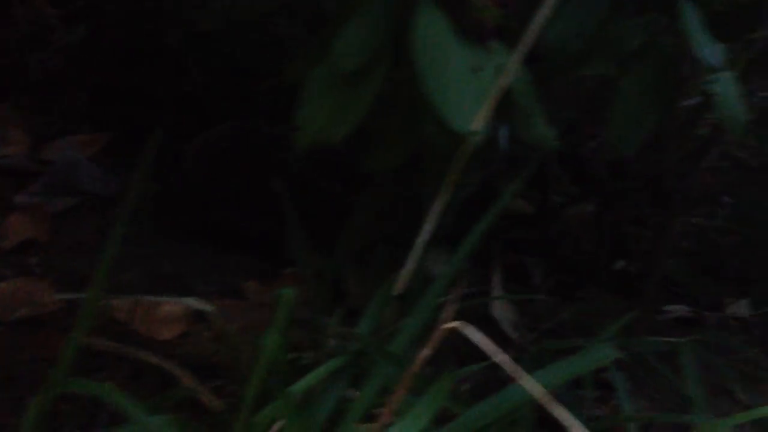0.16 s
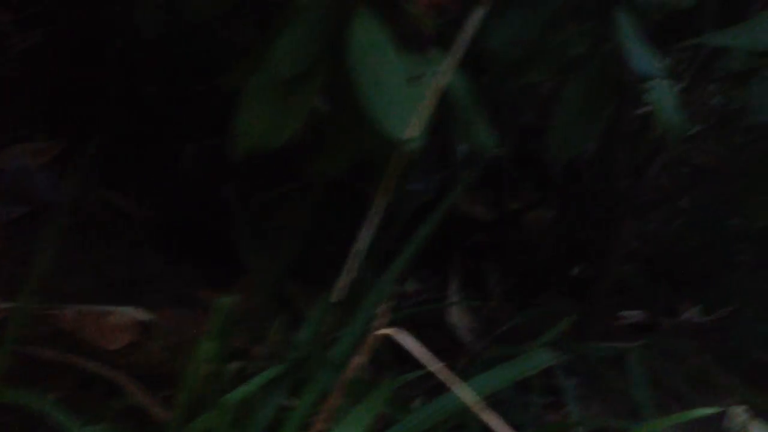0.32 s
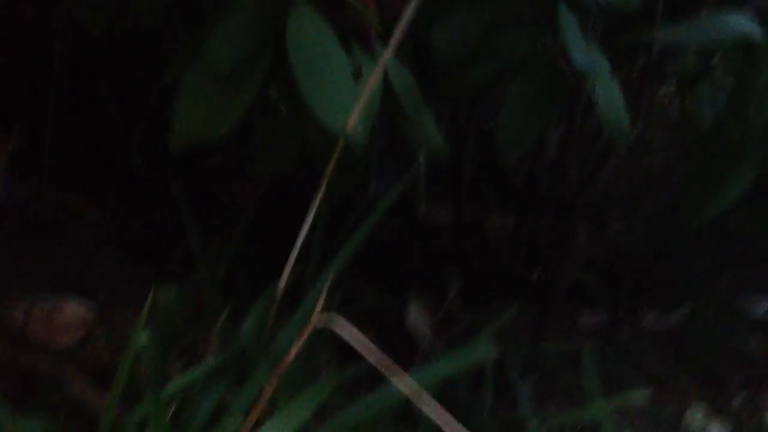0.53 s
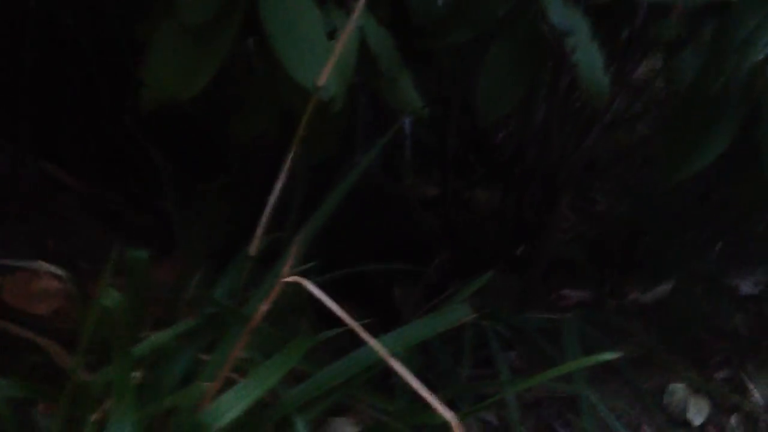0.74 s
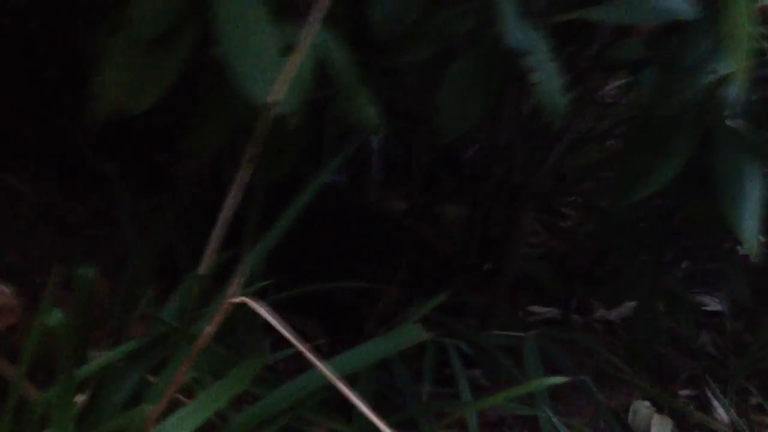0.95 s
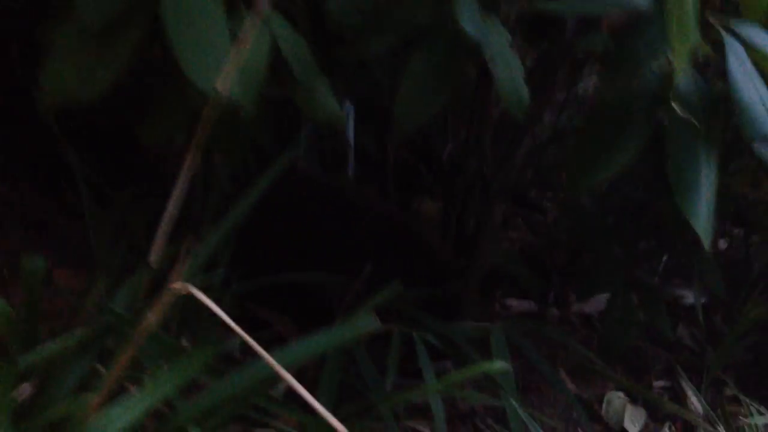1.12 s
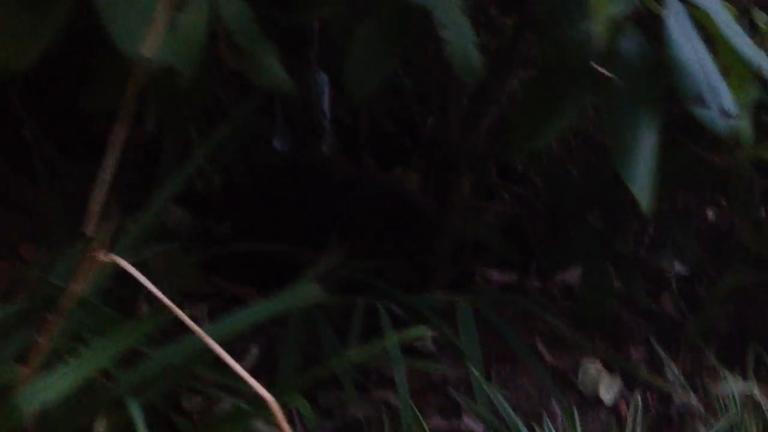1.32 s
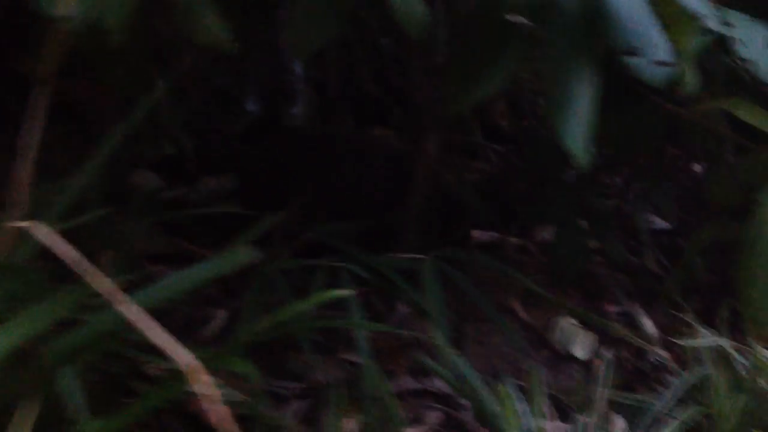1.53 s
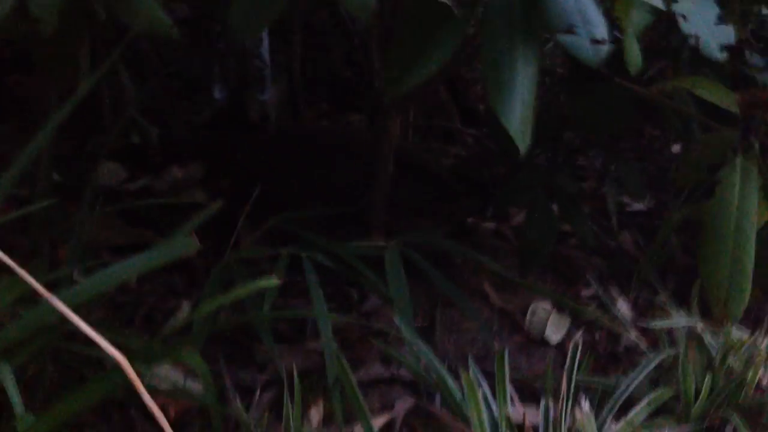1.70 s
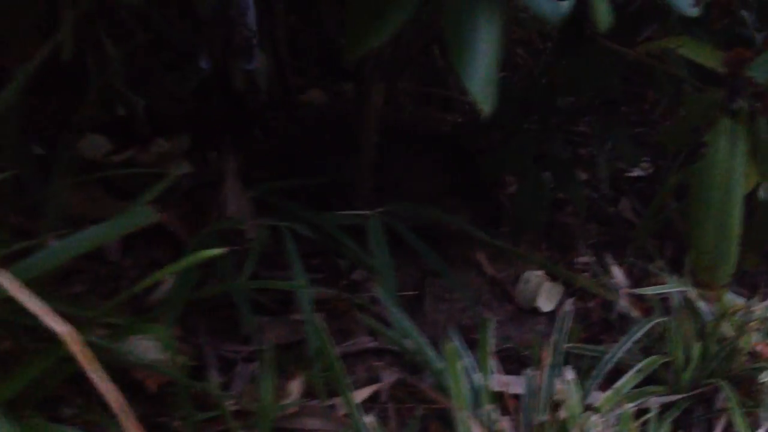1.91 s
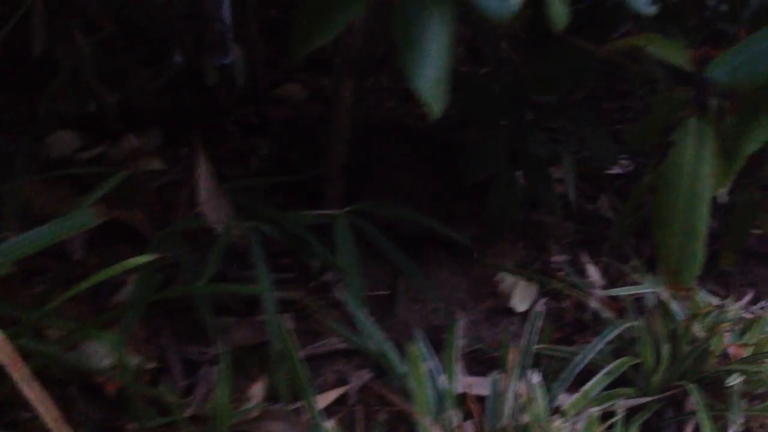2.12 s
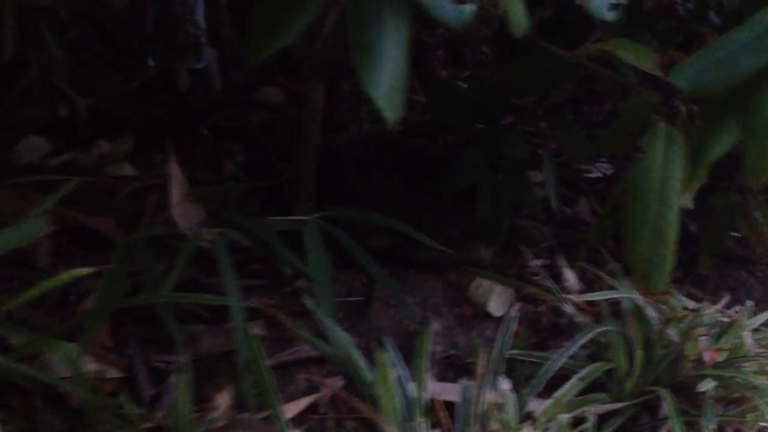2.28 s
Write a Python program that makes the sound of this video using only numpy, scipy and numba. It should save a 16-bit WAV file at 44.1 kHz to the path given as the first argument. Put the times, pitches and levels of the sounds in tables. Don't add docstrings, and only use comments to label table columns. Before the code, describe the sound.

Dry leaves and undergrowth rustle close to a hand-held microphone in a quiet garden. Brief crackles and small woody knocks open it, a denser rustle builds from 0.45 to 0.9 s, and sharp snaps peak around 1.3 s. After a lull near 1.5 s, crisp bursts return at 1.6 and 1.85 s, fading after 2.1 s into faint hum, foliage hiss and slight handling rumble.

```python
import sys
import numpy as np
from scipy import signal
from scipy.fft import rfft, irfft
from scipy.io import wavfile
from scipy.ndimage import uniform_filter1d
from numba import njit

SR = 44100
rng = np.random.default_rng(int(sys.argv[2]) if len(sys.argv) > 2 else 0)


def log_audio(samples):
    frames = np.atleast_2d(samples).T
    limited = np.clip(frames, -1, 1)
    pcm = np.round(limited * 32767).astype(np.int16)
    wavfile.write(sys.argv[1], SR, pcm)


def voltage_ratio(decibels):
    exponent = np.asarray(decibels, float) / 20
    return 10 ** exponent


N = 103635
T = np.arange(N) / SR


def colour(x, points):
    p = np.array(points, float)
    hz = np.maximum(np.arange(2049) * SR / 4096, 1)
    log_gain = np.interp(np.log(hz), np.log(p[:, 0]), p[:, 1]) * np.log(10) / 20
    cepstrum = irfft(log_gain)
    cepstrum[1:2048] *= 2
    cepstrum[2049:] = 0
    return signal.fftconvolve(x, irfft(np.exp(rfft(cepstrum))))[:len(x)]


def butter(x, order, hz, kind):
    return signal.sosfilt(signal.butter(order, hz, kind, fs=SR, output="sos"), x)


def unit(x):
    return x / np.sqrt(np.mean(x ** 2))


def swells(rows):
    start_s, rise_s, fall_s, level_db = np.array(rows, float).T[:4, :, None]
    u = T - start_s
    rise = np.sin(np.pi / 2 * np.clip(u / rise_s, 0, 1)) ** 0.99
    return voltage_ratio(level_db) * rise * np.exp(-2 * np.maximum(u - rise_s, 0) / fall_s)


def together(envelopes):
    return np.sqrt(np.sum(envelopes ** 2, axis=0))


def walk(count):
    k = N // count
    steps = np.repeat(rng.standard_normal(count + 1), k)
    return unit(uniform_filter1d(steps, k)[:N])


@njit
def grains(n, start_s, hz, t60_s, size):
    y = np.zeros(n)
    for k in range(len(start_s)):
        turn = np.exp(2j * np.pi * hz[k] / SR - np.log(1000) / (t60_s[k] * SR))
        z = size[k] + 0j
        for i in range(int(start_s[k] * SR), min(n, int((start_s[k] + t60_s[k]) * SR))):
            y[i] += z.imag
            z *= turn
    return y


def rustle(rows, points, cycles, scatter_db, patchy_db, count):
    ring_db, ring_oct = 10, 0.16
    when, pitch, strength = rng.random((count, 3)).T
    shove = swells(rows)
    hz = 500 + 15500 * pitch
    at = (when * N).astype(int)

    bands = np.array([walk(count=300) for _ in range(6)])
    patches = bands[(6 * pitch ** 0.7).astype(int), at]

    loudest = np.argmax(shove, axis=0)
    leaf_hz = np.array(rows)[:, -1][loudest][at]
    ring = np.exp(-0.5 * (np.log2(hz / leaf_hz) / ring_oct) ** 2)

    db = -scatter_db * np.log(strength + 0.03) + patchy_db * patches + ring_db * ring
    t60_s = cycles / np.maximum(hz, 3000)
    crackle = grains(N, when * N / SR, hz, t60_s, voltage_ratio(db) * np.sqrt(hz))
    return unit(colour(crackle, points)) * together(shove)


def garden():
    # hz, level_db
    bed_colour = [(45, -31), (115, 0.5), (170, -1), (470, -8.5), (520, -10), (1400, -13), (2700, -16.5),
                  (7000, -12), (15000, -23.5)]
    # hz, width_hz, level_db
    drones = [(157.3, 24.6, -72), (458.7, 40, -78.5)]
    # time_s, hiss_db
    breeze = [(0, -0.5), (.1, -1.5), (.3, 1), (.9, 2.5), (1.1, -2), (1.4, 0.5), (1.77, -1.5), (2.0, 2),
              (2.35, -2)]
    bed = unit(colour(rng.standard_normal(N), bed_colour)) * voltage_ratio(-61.5)
    low = butter(bed, 1, 900, "low")
    hiss = (bed - low) * voltage_ratio(np.interp(T, *np.array(breeze).T))
    hum = np.zeros(N)
    for hz, width_hz, db in drones:
        b, a = signal.iirpeak(hz, hz / width_hz, fs=SR)
        hum += voltage_ratio(db) * unit(signal.lfilter(b, a, rng.standard_normal(N)))
    return low + hiss + hum


def leaves():
    # start_s, rise_s, fall_s, level_db, leaf_hz
    brushes = [(.001, 0.0035, 0.026, -47, 6940), (.11, 0.026, 0.15, -60.5, 6500),
               (.205, 0.0085, 0.024, -46, 6840), (1.89, 0.026, 0.21, -60.5, 6960),
               (.464, 0.0024, 0.0053, -38.5, 7500), (.476, 0.0096, 0.09, -49.5, 7740),
               (.255, 0.014, 0.11, -58, 7700), (.31, .005, 0.071, -58, 8140),
               (.387, 0.0031, 0.03, -56.5, 8000), (.52, 0.026, 0.008, -48, 6600),
               (.715, 0.048, 0.02, -50.5, 8650), (.968, .003, 0.044, -49.5, 8500),
               (1.15, 0.0027, 0.11, -53.5, 7600), (1.188, 0.02, 0.063, -53.5, 6960),
               (1.222, 0.0067, 0.037, -48, 6950), (1.24, 0.018, .014, -54, 6600),
               (.69, .012, .03, -59, 7500), (.765, 0.011, 0.032, -53, 6500),
               (1.327, 0.0035, 0.032, -49, 7500), (1.35, 0.013, 0.02, -46.5, 8050),
               (1.555, 0.011, 0.025, -41.5, 7200), (1.585, 0.014, 0.041, -45.5, 6350),
               (1.615, 0.0031, 0.018, -45, 6500), (1.628, 0.015, 0.019, -45, 6200),
               (1.645, 0.0088, 0.018, -41, 6750), (1.655, 0.011, 0.029, -44.5, 7250),
               (1.735, 0.0049, 0.011, -62, 7560), (1.805, 0.044, 0.03, -52, 7300),
               (1.848, 0.014, 0.026, -40, 6800), (1.99, 0.013, 0.064, -51, 6400),
               (2.047, 0.0092, 0.018, -44, 7460), (2.016, .004, 0.034, -53.5, 5950),
               (2.08, 0.0029, 0.13, -51, 7300), (2.16, 0.072, 0.079, -63.5, 7060)]
    # hz, level_db
    leaf_colour = [(400, -64), (800, -12), (2200, -13), (4000, -4), (8000, -6.5), (11000, -8.5),
                   (15000, -16.5)]
    return rustle(brushes, leaf_colour, cycles=48, scatter_db=5.0, patchy_db=1.6, count=40000)


def knocks():
    # start_s, level_db, pitch_hz, t60_s
    hits = [(.004, -47.5, 1200, 0.013), (0.162, -45, 3580, 0.012), (0.209, -48, 1730, 0.018),
            (.33, -56, 428, 0.056), (0.427, -50.5, 1830, 0.02), (0.463, -43, 1490, 0.0152),
            (1.722, -51.5, 1840, 0.014), (1.7353, -48, 2430, 0.0087), (1.855, -48.5, 1160, 0.024),
            (1.868, -52.5, 607, 0.039), (1.998, -55.5, 920, 0.0144)]
    start_s, db, hz, t60_s = np.repeat(np.array(hits, float), 30, axis=0).T
    late, detune = rng.random((len(start_s), 2)).T
    ring_s = start_s + 0.5 * t60_s * late ** 2
    ring_hz = hz * 2 ** (1.53 * (detune - 0.5))
    return grains(N, ring_s, ring_hz, 0.77 * t60_s, voltage_ratio(db - 11.5))


def snaps():
    # start_s, peak_db, ring_hz, tail_s
    stalks = [(0.1615, -33.5, 6300, 0.0072), (0.3895, -44, 3900, 0.004), (0.3135, -48, 8350, .004),
              (.4005, -42, 4000, .003), (.4095, -35, 11600, .004), (.4274, -40, 3800, .004),
              (.479, -34, 6570, .005), (.4865, -45, 4200, .003), (.7275, -32, 4600, .004),
              (0.868, -51, 4150, .004), (1.0185, -33, 8400, 0.0045), (1.152, -29, 9400, .003),
              (1.1912, -31, 4820, .005), (1.241, -32, 6600, .003), (1.6382, -35, 6240, .003),
              (2.0004, -44, 7190, .004), (0.4619, -28.5, 8100, 0.0035), (0.6992, -29, 4560, 0.027),
              (0.743, -31, 4270, 0.0087), (0.9692, -43, 5000, 0.006), (1.1568, -25.5, 7920, 0.0091),
              (1.2857, -16, 6800, 0.0067), (1.039, -45, 4700, .005), (1.0985, -44, 8600, .003),
              (1.1104, -44, 4400, .004), (1.12, -40, 8600, .004), (1.144, -45, 8600, 0.0043),
              (.743, -37, 8600, .003), (.774, -32, 4300, .006), (1.887, -34, 6500, .004),
              (1.3084, -28.5, 7600, 0.011), (1.346, -20, 8260, 0.0043), (1.3527, -14.5, 8900, 0.0038),
              (1.3574, -15, 4230, 0.0048), (1.615, -28, 5930, 0.0051), (1.657, -24.5, 7250, 0.0028),
              (1.662, -28.5, 6900, 0.005), (1.697, -34, 6270, 0.0053), (1.7355, -27, 6420, 0.0084),
              (1.7454, -32.5, 7700, 0.0043), (1.826, -36, 6810, 0.004), (1.8597, -24, 8000, 0.003),
              (2.055, -36, 7860, 0.012), (2.0807, -26.5, 7300, 0.0086)]
    # hz, level_db
    snap_colour = [(500, -64), (2900, -36), (4300, -1), (5700, -6), (8200, 0.5), (10800, -8.5), (13000, -7),
                   (15000, -9.5)]
    late_s, attack_s, ring_s, crack_s = 0.000872, 0.00024, 0.00068, 0.00038
    tail_db, level_db = -14, -3.5
    brighter = 0.28

    out = np.zeros(N)
    u = np.arange(2000) / SR
    noise = rng.standard_normal((len(stalks), len(u)))
    dull = butter(noise, 3, 9000, "low")
    for (start_s, db, hz, tail_s), bright_noise, dull_noise in zip(stalks, noise, dull):
        i = int((start_s + late_s) * SR)
        treble_db = brighter * (db + 29.5) + 3.7 * np.log2(hz / 7000)
        splinters = dull_noise + voltage_ratio(treble_db) * (bright_noise - dull_noise)
        decay = np.exp(-u / crack_s) + voltage_ratio(tail_db) * np.exp(-u / tail_s)
        ring = np.sin(2 * np.pi * hz * u) * np.exp(-u / ring_s)
        burst = np.minimum(u / attack_s, 1) * (ring + splinters * decay)
        out[i:i + len(u)] += voltage_ratio(db + level_db) * burst / np.max(np.abs(burst))
    return 2 * colour(out, snap_colour)


def litter():
    # start_s, rise_s, fall_s, level_db, leaf_hz
    shoves = [(.22, 0.04, 0.14, -58, 3300), (.325, .012, 0.047, -55, 3850),
              (.308, 0.0075, 0.036, -52, 3650), (.388, 0.0078, 0.056, -55, 3930),
              (.425, 0.011, 0.09, -52, 3700), (.468, 0.0081, 0.076, -45.5, 4240),
              (.5, .012, 0.017, -51, 4240), (.522, 0.013, 0.015, -55, 4400),
              (.555, 0.012, 0.037, -53, 4300), (.58, 0.013, 0.022, -49, 4270), (.6, .02, 0.065, -56, 4400),
              (.64, 0.047, 0.1, -53.5, 4500), (.712, 0.015, 0.057, -46, 4760), (.74, 0.022, .03, -47, 4400),
              (.768, 0.013, 0.033, -43, 4330), (.8, 0.015, 0.14, -53.5, 4540),
              (.865, 0.0024, .02, -51.5, 4400), (.878, 0.012, 0.064, -49.5, 4500),
              (.915, 0.0091, 0.027, -51, 4740), (.967, 0.013, 0.1, -54, 4930),
              (1.015, 0.03, 0.023, -55, 4870), (1.05, 0.015, .06, -61, 4670),
              (1.11, 0.0092, 0.15, -60, 4800), (1.157, 0.0031, 0.047, -49, 4260),
              (1.188, 0.004, 0.047, -46, 4900), (1.221, 0.0099, 0.036, -48, 4650),
              (1.25, 0.014, 0.011, -54.5, 4360), (1.297, 0.0031, 0.021, -50.5, 3820),
              (1.325, 0.0032, 0.084, -51, 4660), (1.37, 0.051, 0.046, -54, 4400),
              (1.44, 0.021, 0.17, -55, 4850), (1.555, 0.027, 0.039, -66, 4100),
              (1.85, 0.011, 0.054, -49, 4440), (2.04, 0.023, 0.016, -54, 4530)]
    # hz, level_db
    litter_colour = [(400, -39), (800, -9.5), (1900, -10.5), (2900, -17.5), (3700, -5), (5600, -9.5),
                     (9000, -10), (15000, -26.5)]
    return rustle(shoves, litter_colour, cycles=37.0, scatter_db=0.5, patchy_db=1.2, count=30000)


def squeaks():
    # start_s, length_s, top_hz, level_db, arch (0-1)
    rubs = [
        (.948, .052, 1550, -63, .75),
        (1.466, .063, 1500, -60, 1.),
        (1.874, .026, 1590, -58, .1),
        (1.789, .011, 1800, -63, .1),
    ]
    top, drop, loudest = 0.64, 0.3, 0.9
    out = np.zeros(N)
    for start_s, length_s, top_hz, db, arch in rubs:
        u = np.clip((T - start_s) / length_s, 0, 1)
        rising = (1 - u / top) ** 2.5 if top >= 1 else np.maximum(1 - u / top, 0) ** 2.5
        falling = 1.1 * ((u - top) / (1 - top)) ** 2
        hz = top_hz * (1 - arch * drop * np.where(u < top, rising, falling))
        swell = np.interp(u, [0, loudest, 1], [0, 1, 0]) ** 0.63
        tone = np.sqrt(2) * np.sin(2 * np.pi * np.cumsum(hz) / SR)
        out += voltage_ratio(db) * swell * voltage_ratio(walk(count=400)) * tone
    return out


def handling():
    # start_s, rise_s, fall_s, level_db
    shifts = [
        (2.11, 0.047, 0.043, -63),
        (2.2, 0.035, 0.066, -60.5),
        (2.27, 0.025, 0.043, -60),
        (2.32, 0.051, .04, -56),
    ]
    centre_hz = 179
    rumble = butter(rng.standard_normal(N), 2, [centre_hz / 1.52, centre_hz * 1.43], "band")
    return unit(rumble) * together(swells(shifts))


def scene():
    scatter_t60_s, scatter_db = 0.07, -13
    near = leaves() + knocks() + snaps() + litter() + squeaks()
    near = butter(near, 2, 250, "high")
    u = T[:SR // 5]
    echo = rng.standard_normal(len(u)) * np.exp(-np.log(1000) * u / scatter_t60_s)
    wet = signal.fftconvolve(near, echo / np.sqrt(np.sum(echo ** 2)))[:N]
    return (near + voltage_ratio(scatter_db) * wet + garden() + handling())[None]


def low_pass(x):
    return signal.sosfilt(signal.butter(12, 17100, fs=SR, output="sos"), x)


def record(dry):
    # hz, level_db
    microphone = [(2000, 2.5), (2900, 2), (4200, 0.5), (9000, -0.5), (10900, -3), (12500, 3), (15200, 3.5),
                  (15700, -40), (18500, -43)]
    low_cut = butter(dry[0], 2, 60, "high")
    return low_pass(colour(low_cut, microphone)[None])


dry = scene()
out = record(dry)
log_audio(out)
```